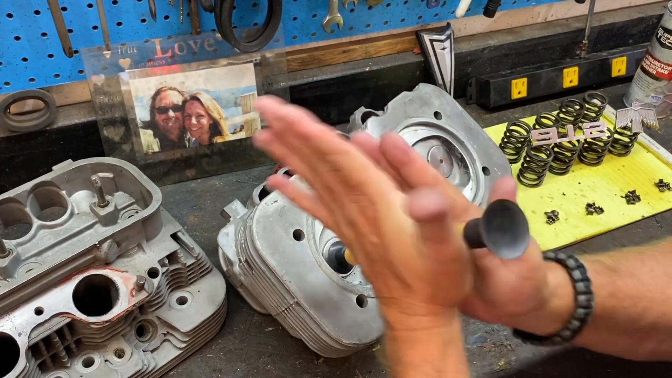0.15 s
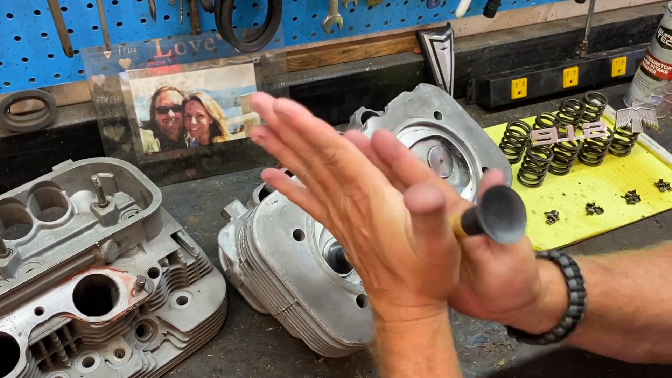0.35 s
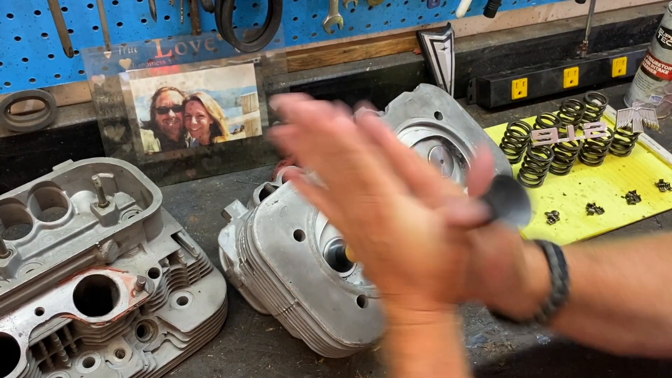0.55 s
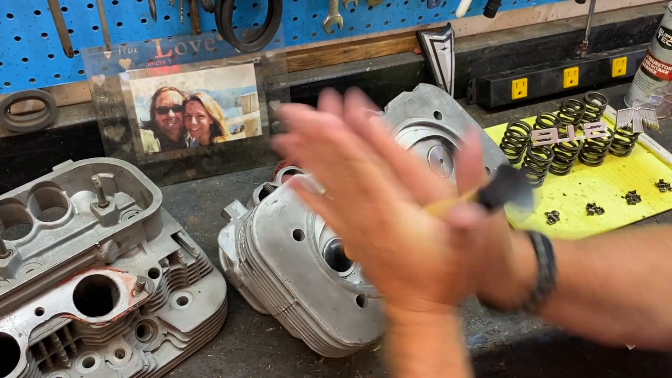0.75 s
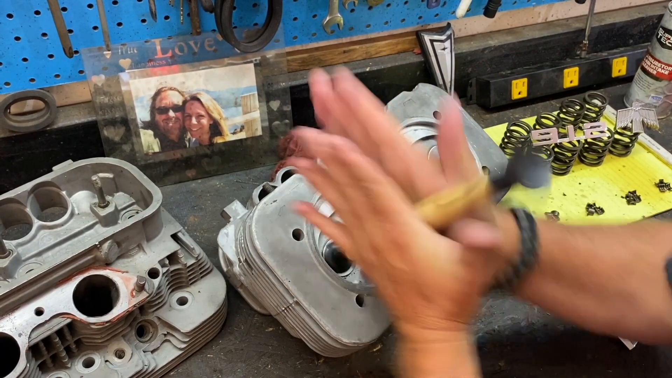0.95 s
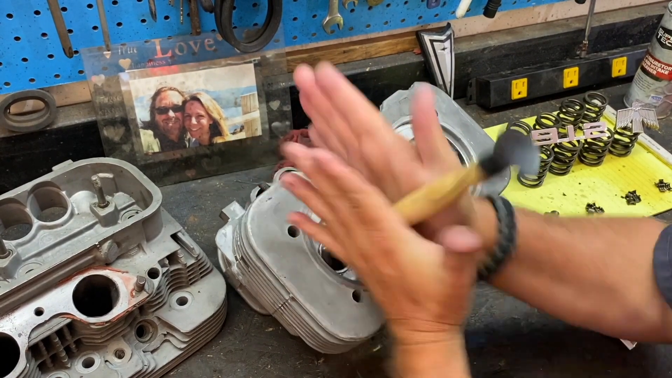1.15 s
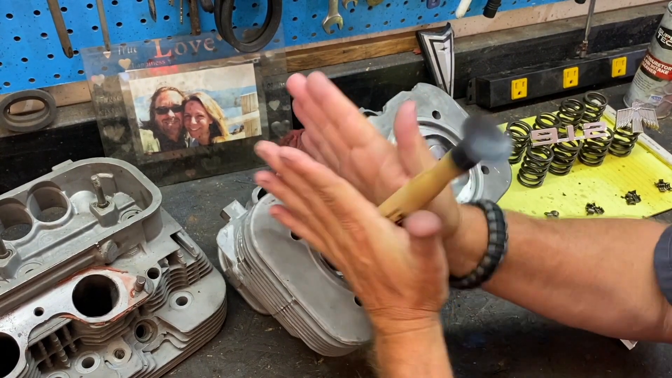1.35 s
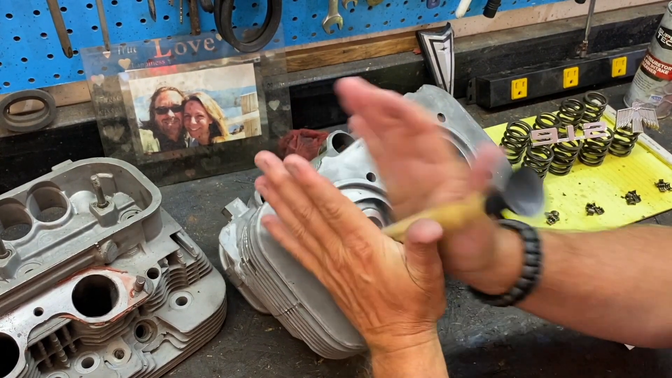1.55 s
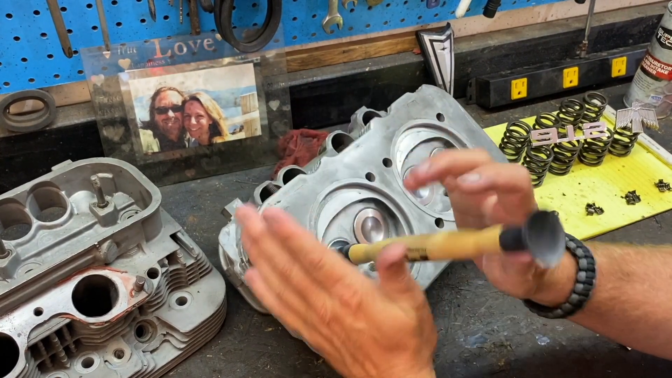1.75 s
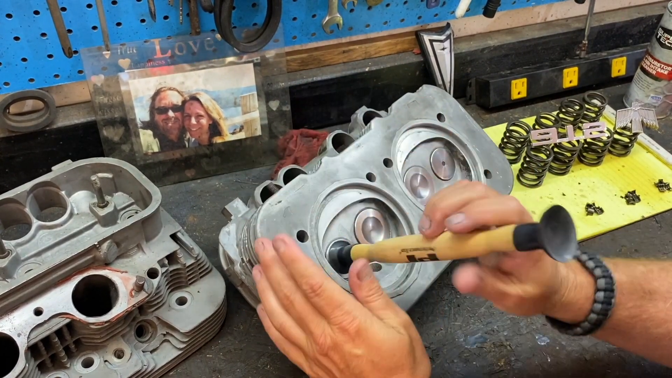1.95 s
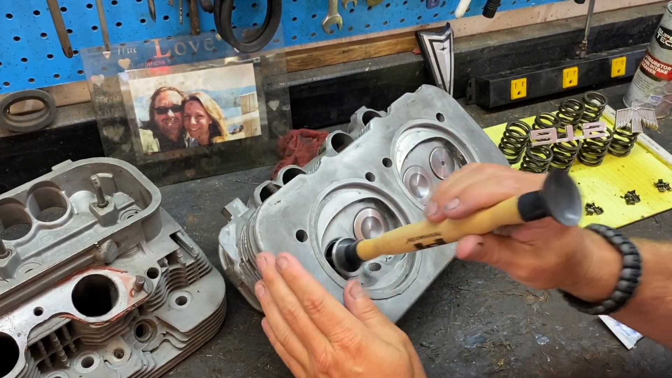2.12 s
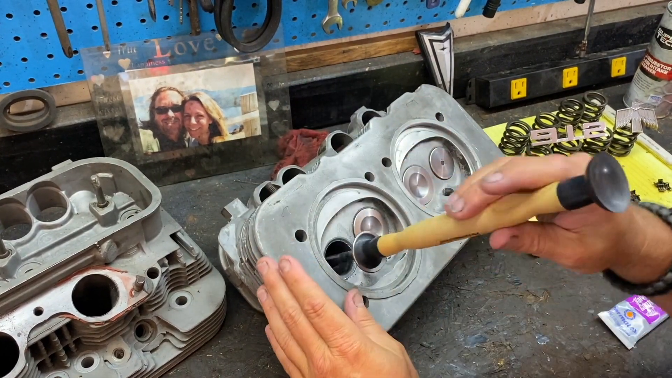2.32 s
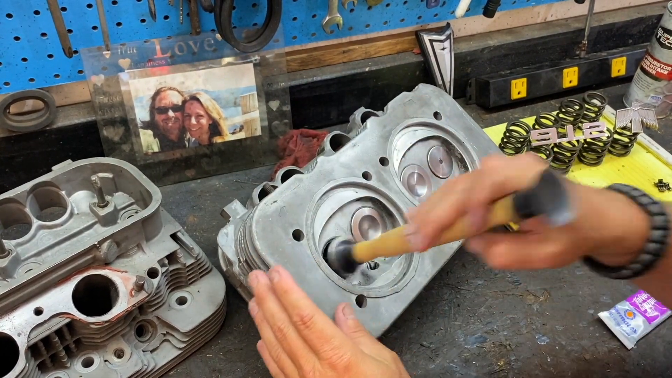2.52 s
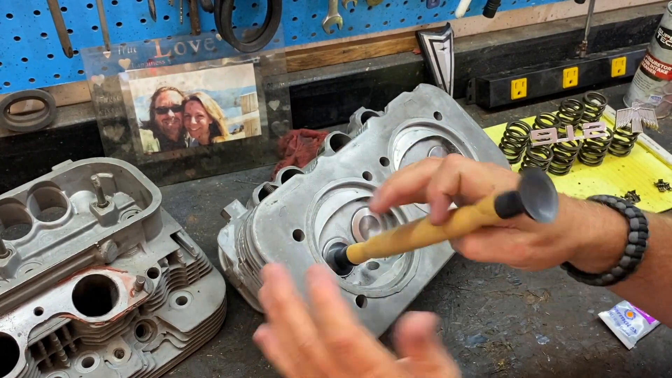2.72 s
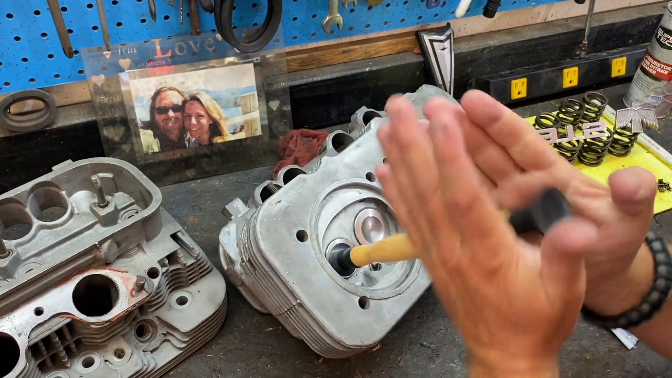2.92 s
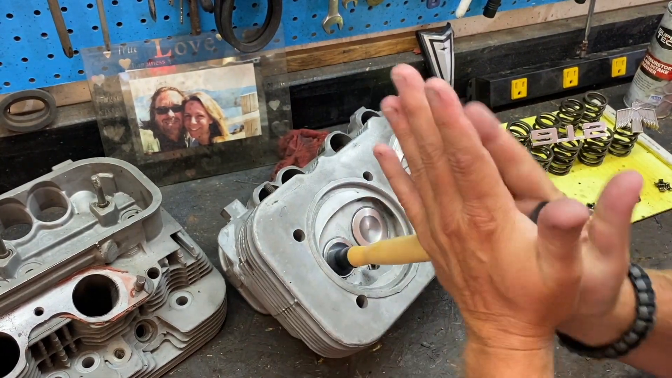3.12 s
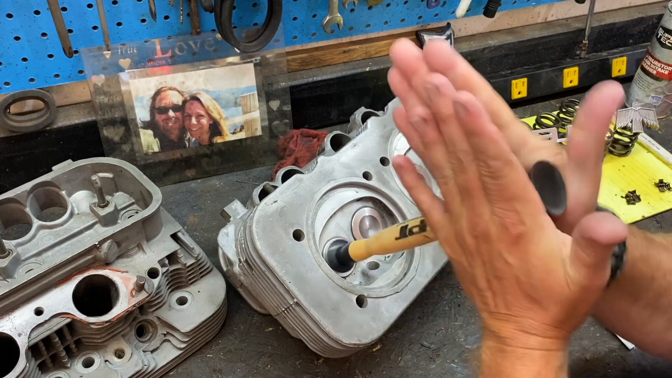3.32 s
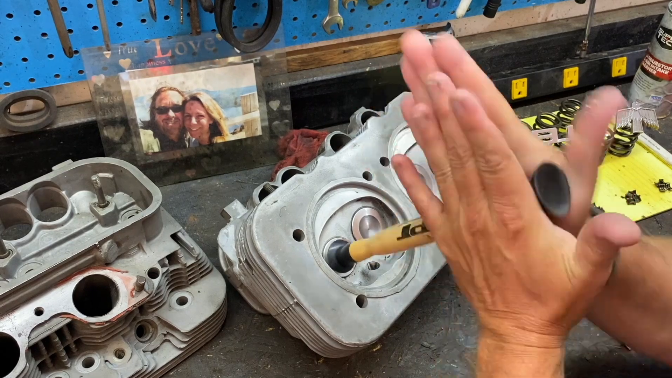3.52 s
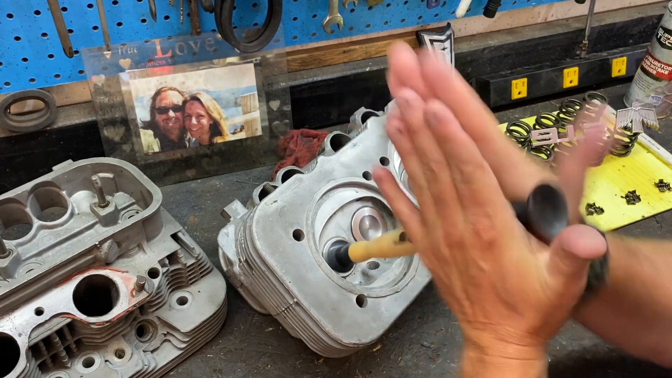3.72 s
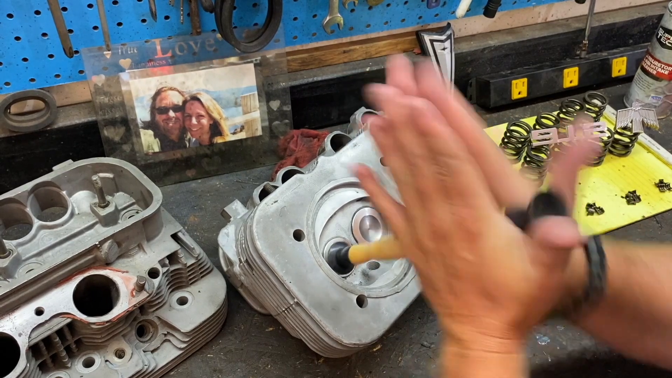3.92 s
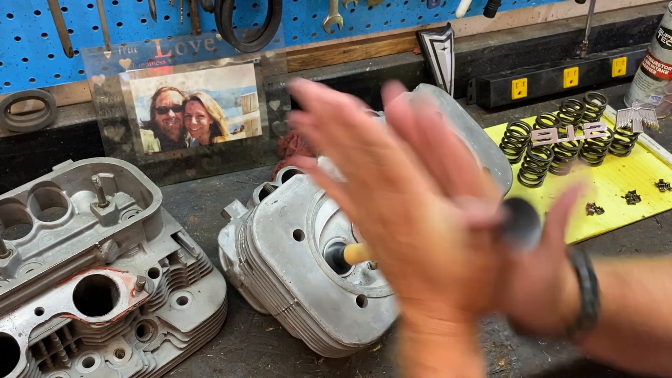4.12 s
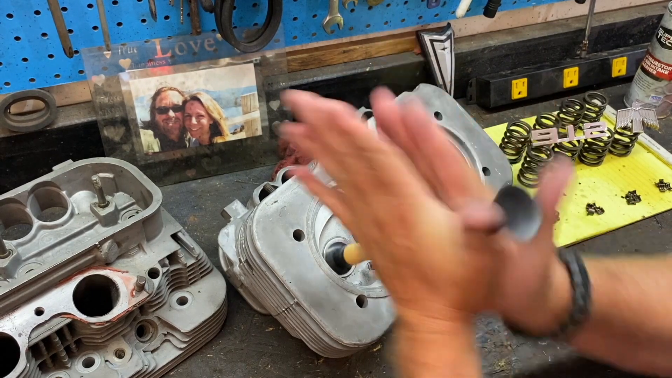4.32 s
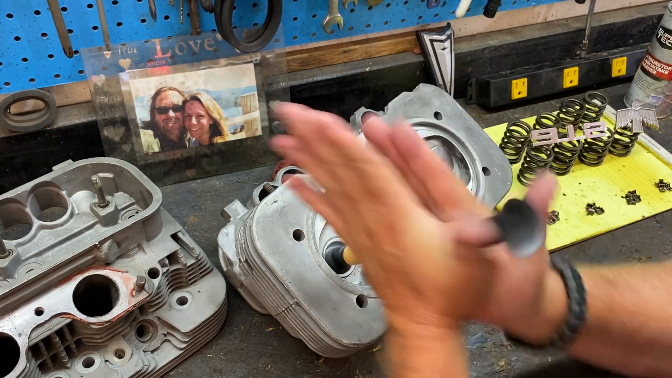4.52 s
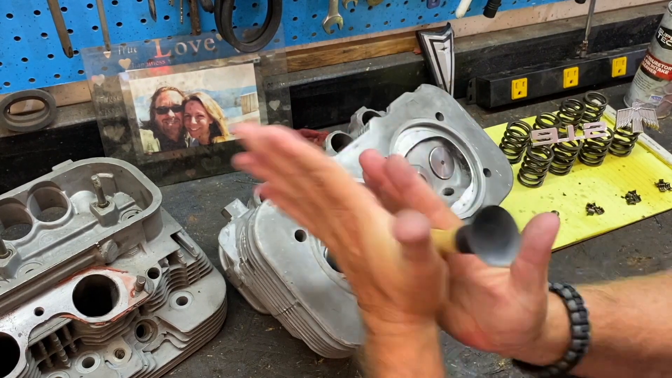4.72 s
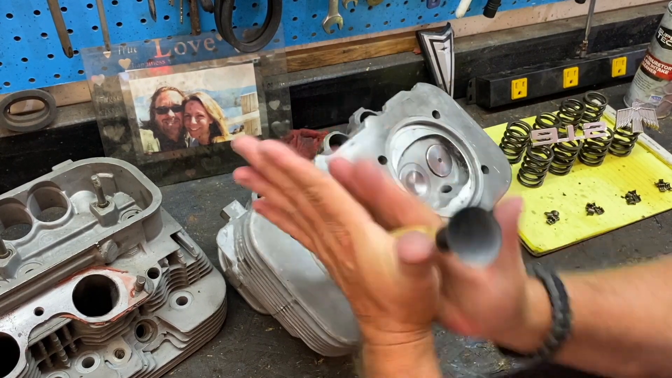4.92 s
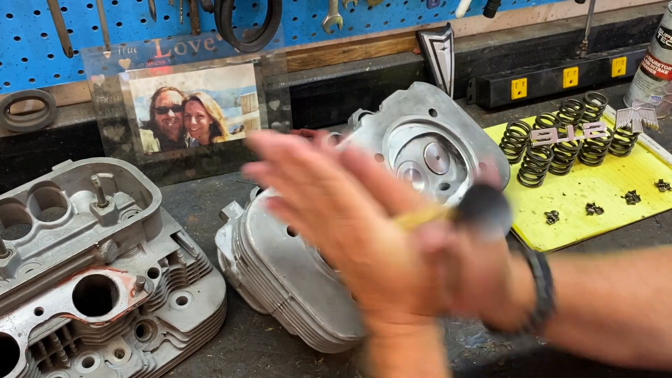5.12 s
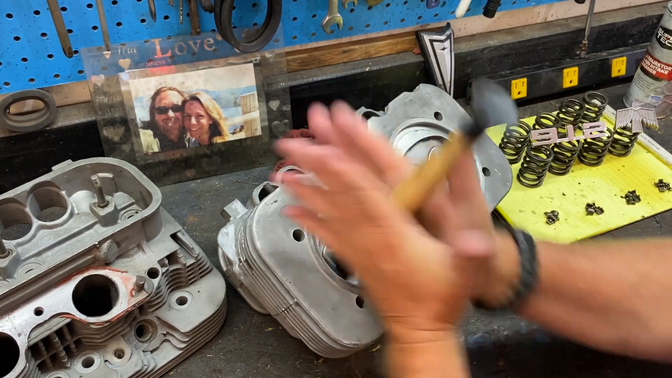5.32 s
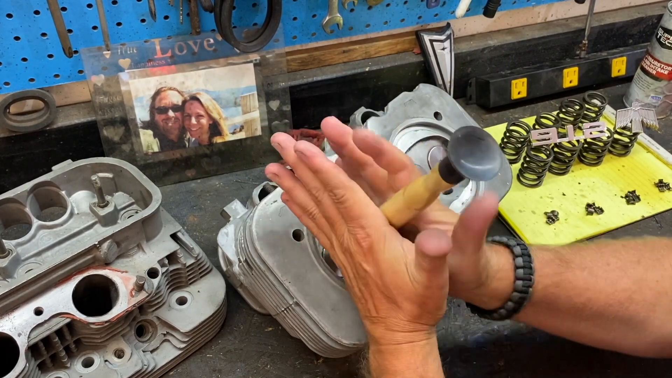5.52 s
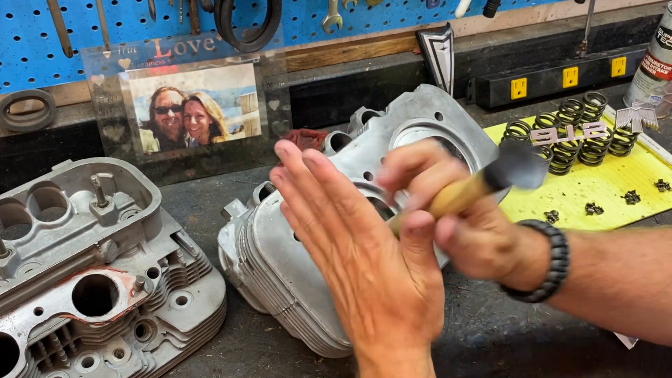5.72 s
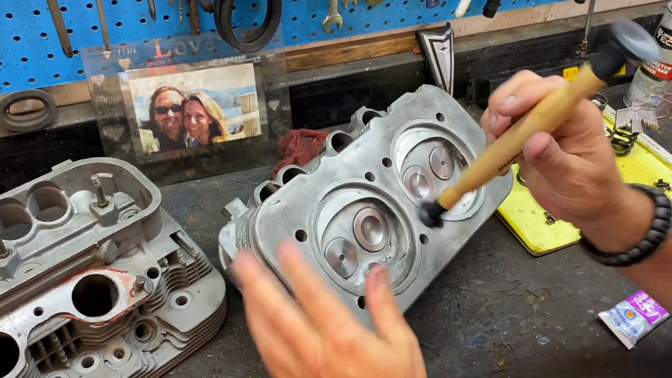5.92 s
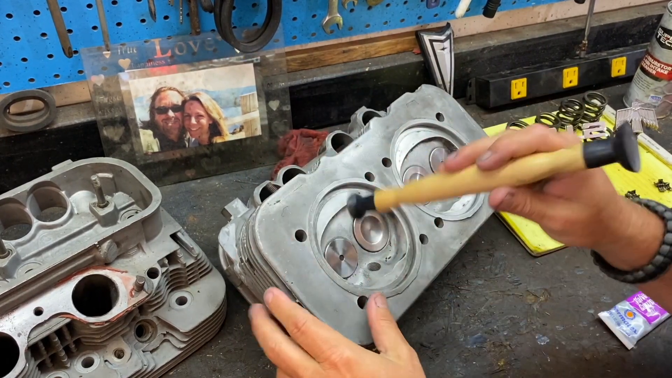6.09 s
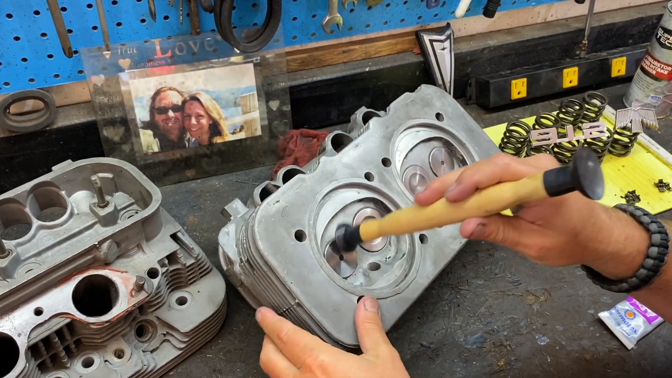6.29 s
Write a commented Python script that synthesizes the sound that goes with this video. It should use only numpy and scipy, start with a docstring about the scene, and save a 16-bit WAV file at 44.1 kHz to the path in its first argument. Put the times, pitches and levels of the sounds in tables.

```python
"""Valve lapping in a cylinder head

A valve is lapped into an aluminium head with a suction stick rolled between the palms. Each twist breaks
abrasive grains on the seat, as random clicks that ring valve and head; the paste film groans, squawks, squeals.
Between two bouts the stem slides and the valve clacks down as bursts and decaying modes. As the cup works
loose, the stick raps the head; filtered noise and damped sines make the rocking bench. A dull rush and hum lie below.
"""
import sys
import numpy as np
from scipy import signal
from scipy.fft import rfft, irfft, next_fast_len
from scipy.io import wavfile
from scipy.ndimage import uniform_filter1d

SR = 44100
rng = np.random.default_rng(int(sys.argv[2]) if len(sys.argv) > 2 else 0)


def to_wav(s):
    """Save 16-bit WAV."""
    ch = np.atleast_2d(s).T  # columns
    pcm = np.round(np.clip(ch, -1, 1) * 32767)  # PCM
    wavfile.write(sys.argv[1], SR, pcm.astype(np.int16))


N = 280167
TIME = np.arange(N) / SR


def from_db(db):
    """Amplitude factor of a level in dB."""
    return 10 ** (np.asarray(db) / 20)


def rms_one(x):
    """Scale to an rms of 1."""
    return x / np.sqrt(np.mean(x ** 2) + 1e-20)


def unit_energy(x):
    """Scale to a sum of squares of 1."""
    return x / np.sqrt(np.sum(x ** 2) + 1e-20)


def evened(x, size):
    """The same texture at a steady rms of 1, judged over size samples."""
    return x / np.sqrt(np.abs(uniform_filter1d(x ** 2, size=size)) + 1e-12)


def drift(knots_per_s):
    """Slow random wander with an rms of 1."""
    knots = rng.standard_normal(4000)
    return rms_one(np.interp(TIME * knots_per_s, np.arange(4000), knots))


def colour(x, spectrum):
    """Causal minimum-phase filter with the given (frequency [Hz], level [dB]) outline."""
    size = next_fast_len(len(x) + 8192)
    hz, db = np.transpose(spectrum)
    grid_hz = np.maximum(np.fft.rfftfreq(size, 1 / SR), 1)
    outline_db = np.interp(np.log(grid_hz), np.log(hz), db)
    cepstrum = irfft(np.log(from_db(outline_db)), size)
    # folding the cepstrum makes the phase minimal
    cepstrum[1:size // 2] *= 2
    cepstrum[size // 2 + 1:] = 0
    return irfft(rfft(x, size) * np.exp(rfft(cepstrum)), size)[:len(x)]


def band(x, edges_hz):
    """Fifth-order Butterworth band-pass."""
    return signal.sosfilt(signal.butter(5, edges_hz, "band", fs=SR, output="sos"), x)


def sound(force, response):
    """A force drives an impulse response."""
    return signal.fftconvolve(force, response)[:N]


def resonance(x, hz, width_hz):
    """Two-pole resonance whose centre may move, stepped in blocks of 256 samples."""
    out, state = np.zeros(N), np.zeros(2)
    r = np.exp(-np.pi * width_hz / SR)
    zeros = np.array([1, 0, -1]) * (1 - r * r) / 2
    for i in range(0, N, 256):
        poles = [1, -2 * r * np.cos(2 * np.pi * hz[i] / SR), r * r]
        out[i:i + 256], state = signal.lfilter(zeros, poles, x[i:i + 256], zi=state)
    return out


def ringing(modes):
    """Impulse response of (frequency [Hz], width [Hz], level [dB]) resonances, signs alternating."""
    t = TIME[:SR // 3]
    out = np.zeros(len(t))
    for k, (hz, width_hz, db) in enumerate(modes):
        gain = (-1) ** k * from_db(db) * 2 * np.pi * width_hz / SR
        out += gain * np.exp(-np.pi * width_hz * t) * np.cos(2 * np.pi * hz * t)
    return out


def dying_noise(t60_s):
    """A crowd of resonances dying together; energy 1."""
    t = TIME[:SR // 3]
    return unit_energy(rng.standard_normal(len(t)) * from_db(-60 * t / t60_s))


def blow(ring_db, ring_t60_s, room_db, room_t60_s):
    """A sharp contact, the ring of the metal and the room's tail."""
    response = from_db(ring_db) * dying_noise(ring_t60_s) + from_db(room_db) * dying_noise(room_t60_s)
    response[0] += 1
    return response


def clicks(rows):
    """One impulse per (time [s], level [dB]) row."""
    out = np.zeros(N)
    for s, db in rows:
        out[int(s * SR)] += from_db(db)
    return out


def grit(per_s, spread_db, clump_db, clumps_per_s):
    """Breaking abrasive grains: random clicks of uneven size whose level wanders by clump_db."""
    sizes = from_db(spread_db * np.minimum(rng.exponential(1, N), 5)) * rng.choice([-1, 1], N)
    breaks = rng.random(N) < per_s / SR
    return rms_one(sizes * breaks * from_db(clump_db * drift(clumps_per_s)))


def swells(rows, roundness):
    """Gain of (start [s], length [s], level [dB], ...) rows: each an arch."""
    out = np.zeros(N)
    for s, length_s, db, *_ in rows:
        arch = np.sin(np.pi * np.clip((TIME - s) / length_s, 0, .9999)) ** roundness
        out += from_db(db) * arch * (TIME < s + length_s)
    return out


def glides(rows):
    """Pitch [Hz] of (start [s], length [s], level [dB], first [Hz], last [Hz]) rows."""
    pitch_hz = np.full(N, float(rows[0][3]))
    for s, length_s, _, first_hz, last_hz in rows:
        glide_hz = np.interp(TIME, [s, s + length_s], [first_hz, last_hz])
        pitch_hz = np.where(TIME >= s, glide_hz, pitch_hz)
    return pitch_hz


# twists of the valve: (start [s], strength [dB], valve ring above strength [dB])
STROKES = [(-0.08, -30, -2.5), (0.018, -31.5, -1.5), (0.123, -32.5, -0.5), (0.234, -31.5, -2),
           (0.336, -32, 0), (0.445, -30.5, 3), (0.545, -32, 0.5), (0.65, -30.5, 1), (0.752, -32, 0),
           (0.856, -32, 0.5), (0.966, -37, 3.5), (1.079, -36, 5), (1.19, -38.5, 2.5), (1.293, -39, -7),
           (1.408, -65, -4.5), (3.153, -33.5, -4.5), (3.263, -32.5, -1), (3.37, -35, -0.5),
           (3.489, -32.5, -1), (3.591, -33, -2.5), (3.707, -32, 2.5), (3.809, -33, -1), (3.919, -32.5, 1.5),
           (4.023, -34.5, -1), (4.136, -34.5, 0.5), (4.245, -34, -4), (4.345, -34, 1.5),
           (4.45, -37.5, -2.5), (4.557, -43, 6), (4.672, -43, 7.5), (4.78, -30.5, 0), (4.89, -43, 6),
           (5.006, -40.5, 3), (5.115, -46.5, 5.5), (5.22, -43, 1.5), (5.36, -57, 2), (5.463, -59, -2)]
# a twist lasts until the next; before a gap of PAUSE_S or more it lasts LAST_TWIST_S
PAUSE_S, LAST_TWIST_S = .13, 0.082


def twists():
    """Per sample: time since twist start [s], time left [s], strength [dB], valve ring [dB]."""
    start_s, strength_db, ring_db = np.transpose(STROKES)
    gap_s = np.diff(start_s, append=np.inf)
    length_s = np.where(gap_s < PAUSE_S, gap_s, LAST_TWIST_S)
    now = np.maximum(np.searchsorted(start_s, TIME) - 1, 0)
    since_s = TIME - start_s[now]
    return since_s, length_s[now] - since_s, strength_db[now], ring_db[now]


def twist_phase():
    """Progress through the twist, 0-1."""
    since_s, left_s, *_ = twists()
    return np.clip(since_s / (since_s + left_s), 0, 1)


def twisting(attack_s, release_s, droop_db, rest):
    """Grinding gain: the valve jerks into motion, droops (swells if negative) and stops in every twist."""
    since_s, left_s, strength_db, _ = twists()
    speed = np.clip(since_s / attack_s, 0, 1) * np.clip(left_s / release_s, 0, 1)
    speed = speed * from_db(droop_db * (.5 - twist_phase()))
    creep = rest * np.exp(np.minimum(left_s, 0) / .012)
    return uniform_filter1d(from_db(strength_db) * (speed + creep), size=120)


# valve set down on fresh paste: (time [s], groan pitch of the thin film [Hz])
SEATINGS = [(-.47, 1170), (3.148, 1437)]
# the paste stays coarse, then is ground fine
COARSE_S, WEAR_S = .5, 0.87


def paste():
    """Per sample: age of the paste [s], wear (0-1), thin-film pitch [Hz]."""
    seated_s, thin_hz = np.transpose(SEATINGS)
    now = np.maximum(np.searchsorted(seated_s, TIME) - 1, 0)
    age_s = TIME - seated_s[now]
    return age_s, np.clip((age_s - COARSE_S) / WEAR_S, 0, 1), thin_hz[now]


# dull rush outline: (frequency [Hz], level [dB])
RUSH_COLOUR = [(18, -31), (30, -13.5), (92, -9), (128, -6.5), (246, -5), (357, -0.5), (598, -6),
               (932, -7.5), (2860, -27.5), (6640, -37), (8000, -40.5), (10400, -49), (16000, -50)]
# faint low hum: (frequency [Hz], level [dB])
HUM = [(63, -65.5), (125, -66), (188, -69.5)]
RUSH_DB = -59.5   # rms in 250-700 Hz


def workshop():
    """Steady filtered noise and a faint hum of sines wavering in level and phase."""
    rush = colour(rng.standard_normal(N), RUSH_COLOUR)
    rush *= from_db(RUSH_DB) / np.std(band(rush, (250, 700)))
    hum = np.zeros(N)
    for hz, db in HUM:
        gain = from_db(db + 0.73 * drift(7.4)) * np.sqrt(2)
        hum += gain * np.sin(2 * np.pi * hz * TIME + 0.6 * drift(12.0))
    return rush + hum


# head rocking on the bench: (start [s], length [s], level [dB])
ROCKING = [(1.01, 0.06, -40), (1.11, 0.088, -43), (1.29, .19, -40.5), (1.51, 0.13, -39.5), (1.6, 0.21, -53),
           (4.19, 0.062, -50), (4.74, 0.17, -44), (4.985, 0.063, -33), (5.05, 0.093, -36),
           (5.22, 0.13, -38.5), (5.49, 0.15, -67)]
# rumble outline: (frequency [Hz], level [dB])
ROCKING_COLOUR = [(13, -45.5), (22, 2), (70, -3), (151, -9.5), (190, -10), (243, -16), (387, -8.5),
                  (440, -8.5), (495, -20.5), (700, -12), (910, -44.5), (1540, -120)]
# dull blows into the bench: (time [s], level [dB], frequency [Hz], t60 [s])
THUDS = [(1.52, -27.5, 72, 0.22), (1.534, -41, 124, 0.54), (2.589, -31, 163, 0.17),
         (4.989, -14.5, 407, 0.028), (4.83, -27.5, 184, 0.087), (5.014, -31, 192, 0.25),
         (5.082, -16.5, 136, 0.035)]
WOBBLE_DB = -33   # rumble of an ordinary twist, relative to its strength
# rumble above the crossover comes in with harder motion, fully at RATTLE_FULL_DB
RATTLE_HZ, RATTLE_FULL_DB = 240, -35


def bench():
    """Lumpy noise rumble that rattles higher up under hard rocking; damped sines as thuds."""
    wobble = from_db(WOBBLE_DB) * twisting(attack_s=0.011, release_s=.02, droop_db=7.5, rest=0.28)
    motion = swells(ROCKING, roundness=0.58) + wobble
    rumble = evened(colour(rng.standard_normal(N), ROCKING_COLOUR), size=3000)
    deep = signal.sosfilt(signal.butter(2, RATTLE_HZ, fs=SR, output="sos"), rumble)
    rattle = np.clip(motion / from_db(RATTLE_FULL_DB), 0, 1)
    out = from_db(-3.0) * motion * (rattle * rumble + (1 - rattle) * deep)
    for s, db, hz, t60_s in THUDS:
        t = np.maximum(TIME - s, 0)
        decay = from_db(db - np.minimum(60 * t / t60_s, 200))
        out += decay * (1 - np.exp(-t / 0.0096)) * np.sin(2 * np.pi * hz * t)
    return out


# stem sliding in its guide: (start [s], length [s], level [dB])
STEM_SLIDES = [(2.12, 0.19, -53), (2.195, 0.13, -54.5), (2.23, 0.053, -45.5), (2.52, 0.098, -42.5)]
# stem resonances: (frequency [Hz], width [Hz], level [dB])
STEM_MODES = [(3030, 44, -7), (3764, 42, -6.5), (5820, 140, -14.5), (6686, 230, 2.5), (6640, 90, -6),
              (8360, 150, -23.5), (9090, 200, -23), (11940, 290, -10.5)]


def stem_slide():
    """Rubbing clicks drive the modes of the oiled stem as it slides in its guide."""
    rub = grit(per_s=4500, spread_db=2.5, clump_db=-0.5, clumps_per_s=61)
    song = band(sound(rub, ringing(STEM_MODES)), (2600, 12000))
    return swells(STEM_SLIDES, roundness=1.2) * rms_one(song)


# stick knocking on the head: (time [s], level [dB])
KNOCKS = [(5.2642, -13.5), (5.2678, -1.5), (5.2805, -14), (5.285, -21)]
# rap outline: (frequency [Hz], level [dB])
KNOCK_COLOUR = [(180, -57), (300, -18), (634, -21), (1140, -2.5), (1810, -12.5), (2700, -9), (3190, -21),
                (4090, 2.5), (4590, -13), (6100, -6), (8360, -37), (14200, -14), (16000, -38)]


def knocks():
    """The loose stick hits the head: impulses with a short dry ring and a room tail."""
    rap = blow(ring_db=11.5, ring_t60_s=0.0073, room_db=7, room_t60_s=0.14)
    return from_db(6.0) * sound(clicks(KNOCKS), unit_energy(colour(rap, KNOCK_COLOUR)))


# valve dropping on its seat and settling: (time [s], level [dB])
CLACKS = [(2.5848, 6), (2.5866, -0.5), (2.5882, 1), (2.5905, 2), (2.5965, -8.5)]
# freed valve and cooling fins: (frequency [Hz], level [dB], t60 [s])
CLACK_MODES = [(1421, -10, .42), (1927, -14, .8), (1986, -10, .8), (2062, -11, .85), (2213, -6, .27),
               (2288, -6, .42), (2385, -8, .36), (2471, -9, .33), (2794, -3, .52), (2945, -8, .42),
               (3262, 0, .3), (3601, -3, .26), (3651, 3, .2), (4188, -2, .28), (4377, 1, .25),
               (4963, -13, .48), (6686, 1, .2), (8899, -7, .24)]
# burst outline: (frequency [Hz], level [dB])
CLACK_COLOUR = [(180, -61.5), (300, -18.5), (372, -13.5), (701, -18), (1210, -4), (2070, -19), (2440, -7.5),
                (2650, -13), (3520, -3), (4520, -2.5), (5250, -12), (6620, -2), (7570, -16.5), (14200, -26),
                (16000, -27)]


def clack():
    """Steel meets the seat in hard bursts; one contact rings valve modes, fins and casting."""
    t = TIME[:SR]
    ring = np.zeros(SR)
    for hz, db, t60_s in CLACK_MODES:
        ring += from_db(db - 60 * t / t60_s) * np.sin(2 * np.pi * hz * t)
    burst = blow(ring_db=5.5, ring_t60_s=.07, room_db=6, room_t60_s=0.16)
    burst = unit_energy(colour(burst, CLACK_COLOUR))
    fins = unit_energy(band(rng.standard_normal(SR), (1100, 3100)) * from_db(-60 * t / .58))
    casting = unit_energy(band(rng.standard_normal(SR), (2800, 9000)) * from_db(-60 * t / .36))
    tail = from_db(-30.5) * ring + from_db(-6.5) * fins + from_db(-4.5) * casting
    return from_db(4.5) * sound(clicks(CLACKS), burst) + sound(clicks(CLACKS[1:2]), tail)


# valve pressed on its seat: (frequency [Hz], width [Hz], level [dB])
SEAT_MODES = [(1830, 45, -11), (2212, 22, -5), (2290, 30, -12), (2385, 45, -12), (2780, 35, -9),
              (3005, 18, 0), (3049, 16, -4), (3340, 45, -9), (3652, 25, -7), (3790, 34, 4), (3960, 27, -2),
              (4148, 25, -6), (4219, 24, -2), (4382, 43, -2), (4690, 28, 0), (4740, 30, -5), (4797, 22, 2),
              (5018, 35, -4), (5430, 90, -10), (6000, 60, -11), (6570, 50, -4), (6691, 35, -6),
              (6842, 42, 5), (7020, 160, -7), (8230, 50, -9), (8680, 110, -8), (9250, 50, -11),
              (11800, 50, -15), (12330, 130, -18)]
# outline of the weaker resonances between: (frequency [Hz], level [dB])
SEAT_HASH = [(1500, -15.5), (2700, -21.5), (3300, -10), (4700, -14), (5250, -11.5), (6400, -6),
             (7150, -15.5), (7750, -14), (8500, -21.5), (9300, -14.5), (9800, -21.5), (13000, -20.5),
             (14900, -20), (15900, -37)]


def seat_response(hash_db, scatter_db):
    """Ring of valve and head to one grain; each spot on the seat has its own random mode strengths."""
    modes = [(hz, width_hz, db + scatter_db * rng.standard_normal()) for hz, width_hz, db in SEAT_MODES]
    ring = ringing(modes)
    crowd = unit_energy(blow(ring_db=13.0, ring_t60_s=0.057, room_db=-10.5, room_t60_s=.24))
    return ring + from_db(hash_db) * colour(crowd, SEAT_HASH)


# large grains cracking: (time [s], level [dB], valve ring above level [dB])
CRACKS = [(0.1066, -33, 1), (0.2798, -25, -6.5), (0.3212, -24.5, 9), (0.5354, -29, 7),
          (0.7263, -29.5, 11.5), (1.0102, -35, 2), (1.211, -43, -1), (1.2363, -33, -8), (1.2992, -33.5, 9),
          (3.572, -21.5, 2), (3.8686, -31, 1), (4.0093, -21.5, 3.5), (4.0806, -48, -5.5), (4.22, -21.5, 3),
          (4.4034, -28, -14), (4.4338, -29.5, 14), (4.4952, -31, -13), (4.9243, -26.5, -13)]
# small random ticks while the valve turns; level relative to twist strength
TICKS_PER_S, TICK_DB, TICK_SPREAD_DB = 22, -5.5, 5


def cracks():
    """Grains snap with a dry tick, few large and many small; the large also ring the valve."""
    s, db, ring_db = np.transpose(CRACKS)
    tick = blow(ring_db=-2.5, ring_t60_s=0.0033, room_db=4, room_t60_s=0.22)
    tick_colour = [(150, -11.5), (400, -9), (1400, -1), (4000, 5), (9000, -6), (16000, -18.0)]
    tick = unit_energy(colour(tick, tick_colour))
    valve = unit_energy(seat_response(hash_db=-1.0, scatter_db=4.5))
    _, left_s, strength_db, _ = twists()
    snaps = (rng.random(N) < TICKS_PER_S / SR) * (left_s > 0)
    small = snaps * from_db(strength_db + TICK_DB + TICK_SPREAD_DB * rng.standard_normal(N))
    ticks = from_db(15.5) * sound(clicks(zip(s, db)) + small, tick)
    return ticks + from_db(13.5) * sound(clicks(zip(s, db + ring_db)), valve)


# bare steel on the seat: (start [s], length [s], level [dB], first pitch [Hz], last pitch [Hz])
SQUEALS = [(.885, 0.076, -31, 6870, 6650), (1.317, 0.044, -26, 6850, 6880),
           (4.547, 0.12, -36.5, 3760, 3860), (4.581, 0.067, -30, 6860, 6880),
           (4.675, 0.032, -38, 7060, 6820), (5.026, 0.1, -41.5, 3360, 4010),
           (5.152, 0.078, -40.5, 6120, 6050)]
SQUEAL_WIDTH_HZ = 55


def squeals():
    """Where the film breaks, friction noise drives one narrow gliding resonance."""
    rub = rng.standard_normal(N)
    out = np.zeros(N)
    for row in SQUEALS:
        pitch_hz = glides([row])
        tone = resonance(resonance(rub, pitch_hz, SQUEAL_WIDTH_HZ), pitch_hz, width_hz=900)
        out += evened(tone, size=700) * swells([row], roundness=1.3)
    return out


def stick_slip(hz, modes, waver):
    """The paste film slips in a broad band around hz that drives the given modes; rms 1."""
    slips = grit(per_s=1500, spread_db=1.0, clump_db=1.0, clumps_per_s=98)
    pitch_hz = hz * (1 + waver * drift(45))
    film = resonance(resonance(slips, pitch_hz, width_hz=250), pitch_hz, width_hz=1200)
    film = band(film + .012 * slips, (290, 1800))
    return evened(film + sound(film, ringing(modes)), size=1000)


# paste film groaning early on, squawking as the valve tilts later:
# (start [s], length [s], level [dB], first pitch [Hz], last pitch [Hz])
SQUAWKS = [(.025, 0.091, -35.5, 900, 1050), (.124, 0.11, -32.5, 1100, 1100), (.24, 0.097, -35, 1100, 1000),
           (0.444, 0.089, -37, 1450, 1200), (1.299, 0.06, -37.5, 1300, 1150),
           (4.747, 0.04, -40, 1130, 1100), (4.774, 0.07, -28, 680, 1040), (4.815, 0.076, -36, 1150, 1530),
           (4.872, 0.12, -39.5, 1150, 1130), (4.987, 0.11, -34.5, 1000, 1200),
           (5.119, 0.081, -48, 1130, 1130), (5.205, .06, -39, 1100, 1130), (5.37, 0.055, -46.5, 1130, 1100),
           (5.453, 0.1, -42.5, 1130, 1020)]
# hollow resonances under a groan or squawk: (frequency [Hz], width [Hz], level [dB])
SQUAWK_MODES = [(807, 60, 5), (1113, 29, 18), (1493, 6.7, 15)]


def squawks():
    """Each groan or squawk of the film glides in pitch or holds it."""
    return stick_slip(glides(SQUAWKS), SQUAWK_MODES, waver=0.028) * swells(SQUAWKS, roundness=0.91)


# lowest resonances of the head: (frequency [Hz], width [Hz], level [dB])
LOW_MODES = [(364, 90, 4), (820, 24, 11), (1144, 69, 8), (1275, 32, 7), (1424, 9.2, 14.5)]
# relative to twist strength on fresh paste; loss with wear
GROAN_DB, GROAN_WEAR_DB = -4, 20
THICK_FILM_HZ, FILM_RISE_HZ_PER_S = 418, 1305
TWIST_RISE_HZ, THICK_FILM_LOSS_DB = 60, 3


def film_groan():
    """Stick-slip in every twist: higher as the film thins, within a twist too, fainter as it wears."""
    age_s, worn, thin_hz = paste()
    pitch_hz = np.minimum(THICK_FILM_HZ + FILM_RISE_HZ_PER_S * age_s, thin_hz)
    pitch_hz = pitch_hz + TWIST_RISE_HZ * (twist_phase() - .5)
    level_db = GROAN_DB - GROAN_WEAR_DB * worn - THICK_FILM_LOSS_DB * np.exp(-age_s / 0.47)
    groan = stick_slip(pitch_hz, LOW_MODES, waver=.04) * from_db(level_db)
    return groan * twisting(attack_s=0.022, release_s=0.033, droop_db=3, rest=0.39)


# contact resonance: sags towards the end of twists weaker than FIRM_DB
CONTACT_HZ, FIRM_DB, SAG_HZ_PER_DB = 6900, -31, 76.5


def contact_pitch():
    """Contact resonance [Hz]: steady under firm palms, sagging through a light twist."""
    _, _, strength_db, _ = twists()
    lightness_db = np.clip(FIRM_DB - strength_db, 0, 13)
    return CONTACT_HZ - SAG_HZ_PER_DB * lightness_db * twist_phase() ** 2


# registers: (low [Hz], high [Hz])
CRUNCH_BAND, HEAD_BAND, VALVE_BAND, FIZZ_BAND = (1650, 2900), (2950, 6200), (6200, 7600), (7600, 16000)
# relative to twist strength on fresh paste; loss with wear
HEAD_DB, HEAD_WEAR_DB = 3.5, 5.5
CRUNCH_DB, CRUNCH_WEAR_DB = -11, 22
VALVE_DB, FIZZ_DB = -1, -2
SQUAWK_CRUNCH_DB = -16.5   # crunch under each row of SQUAWKS, relative to its level
# treble loss on a thick new film, and its decay constant
CUSHION_DB, CUSHION_S = 17, 0.088
# wandering lower contact resonance: wander as a share of centre, level relative to head ring
SCRAPE_HZ, SCRAPE_WANDER, SCRAPE_WIDTH_HZ, SCRAPE_DB = 4085, .13, 82, -13.5


def grinding(spots=3):
    """Breaking grains ring the seat in four registers as load wanders between spots and crunch wears off."""
    age_s, worn, _ = paste()
    *_, ring_db = twists()
    cushion = from_db(-CUSHION_DB * np.exp(-age_s / CUSHION_S))

    head_speed = twisting(attack_s=.02, release_s=0.03, droop_db=3.5, rest=0.19)
    head_speed = cushion * from_db(HEAD_DB - HEAD_WEAR_DB * worn) * head_speed
    crunch_speed = twisting(attack_s=.015, release_s=0.0056, droop_db=-5.0, rest=.12)
    crunch_speed = from_db(CRUNCH_DB - CRUNCH_WEAR_DB * worn) * crunch_speed
    crunch_speed += from_db(SQUAWK_CRUNCH_DB) * swells(SQUAWKS, roundness=2.2)
    valve_speed = twisting(attack_s=0.018, release_s=.038, droop_db=3.0, rest=0.034)
    valve_speed = cushion * from_db(VALVE_DB + ring_db) * valve_speed
    fizz_speed = twisting(attack_s=.03, release_s=.04, droop_db=5.5, rest=0.12)
    fizz_speed = cushion * from_db(FIZZ_DB) * fizz_speed
    registers = [(HEAD_BAND, head_speed), (CRUNCH_BAND, crunch_speed),
                 (VALVE_BAND, valve_speed), (FIZZ_BAND, fizz_speed)]

    loads = np.array([from_db(7.3 * drift(14)) for _ in range(spots)])
    loads /= np.sqrt(np.sum(loads ** 2, axis=0))   # steady total power
    rasp = np.zeros((len(registers), N))
    for load in loads:
        grains = grit(per_s=2600, spread_db=3.5, clump_db=0.0, clumps_per_s=320)
        grains = load * evened(grains, size=800)
        seat = seat_response(hash_db=0.5, scatter_db=4.4)
        rasp += [sound(grains * speed, unit_energy(band(seat, edges_hz))) for edges_hz, speed in registers]
    head, crunch, valve, fizz = rasp

    contact = grit(per_s=7300, spread_db=0.5, clump_db=-1.5, clumps_per_s=160)
    contact = resonance(contact, contact_pitch(), width_hz=170)
    contact = valve_speed * evened(band(contact, (5200, 8200)), size=900)
    # the contact sings out as the cup works loose
    looseness = np.interp(TIME, [4.4, 4.7], [.35, .75])

    scrape = grit(per_s=9100, spread_db=4.0, clump_db=-2.0, clumps_per_s=180)
    scrape_hz = SCRAPE_HZ * (1 + SCRAPE_WANDER * drift(11))   # the valve shifts on its seat
    scrape = band(resonance(scrape, scrape_hz, SCRAPE_WIDTH_HZ), HEAD_BAND)
    scrape = from_db(SCRAPE_DB) * head_speed * evened(scrape, size=900)
    return head + scrape + crunch + fizz + np.sqrt(1 - looseness ** 2) * valve + looseness * contact


def scene():
    """Sum of all sources, one channel."""
    background = workshop() + bench()
    handling = stem_slide() + knocks() + clack()
    lapping = cracks() + squeals() + squawks() + film_groan() + grinding()
    return (background + handling + lapping)[None]


# fully open above OPEN_DB; EXPANSION is dB of cut per dB below it
OPEN_DB, EXPANSION, DEPTH_DB, SINK_DB_PER_S = -44, 1.5, 19.5, 33.5


def suppressor(x):
    """Noise suppressor: opens fast for a loud sound, then lets the background sink slowly."""
    level_db = 10 * np.log10(np.abs(uniform_filter1d(x ** 2, size=1300)) + 1e-12)
    wanted_db = np.clip(EXPANSION * (level_db - OPEN_DB), -DEPTH_DB, 0)
    sink_db = SINK_DB_PER_S * TIME
    gain_db = np.maximum.accumulate(wanted_db + sink_db, axis=-1) - sink_db
    return x * from_db(uniform_filter1d(gain_db, size=900))


CUTOFF_HZ = 15850


def record(dry):
    """The noise suppressor turns quiet passages down; an elliptic low-pass cuts the top steeply."""
    lowpass = signal.ellip(12, .2, 80, CUTOFF_HZ, fs=SR, output="sos")
    return signal.sosfilt(lowpass, suppressor(dry))


dry = scene()
out = record(dry)
to_wav(out)
```